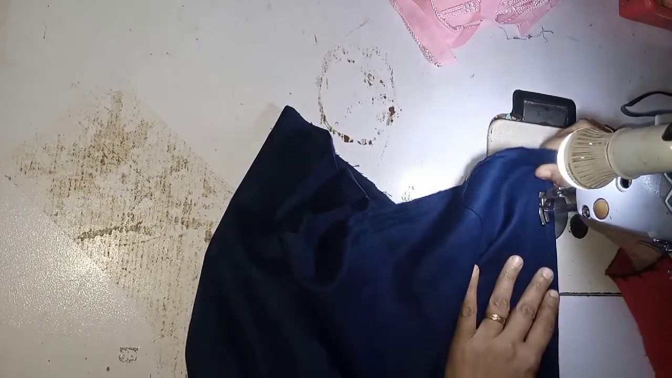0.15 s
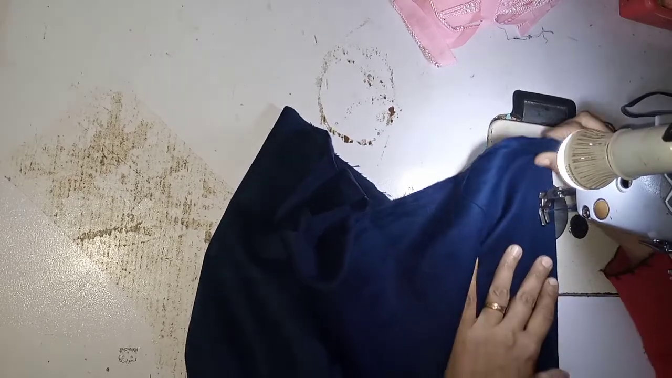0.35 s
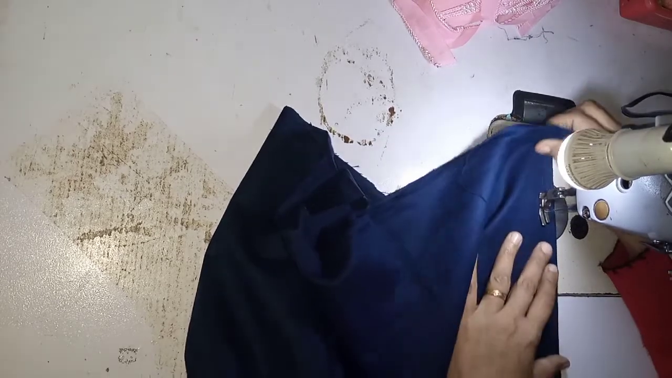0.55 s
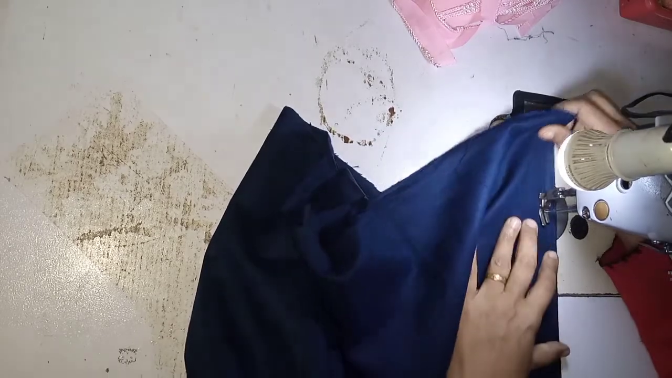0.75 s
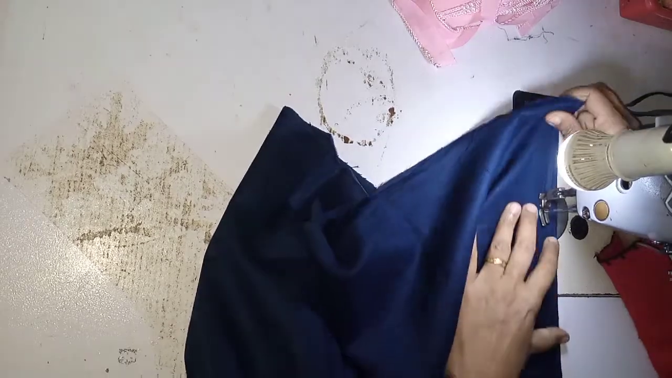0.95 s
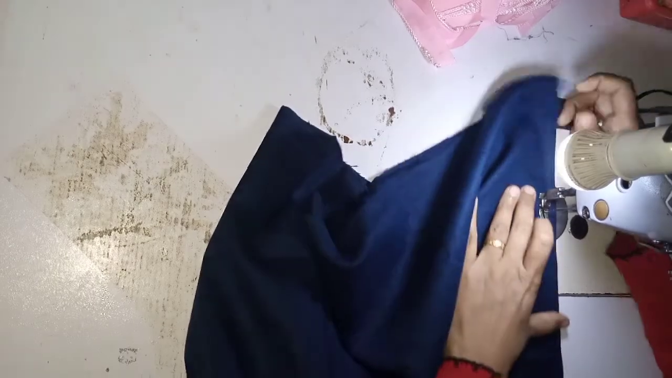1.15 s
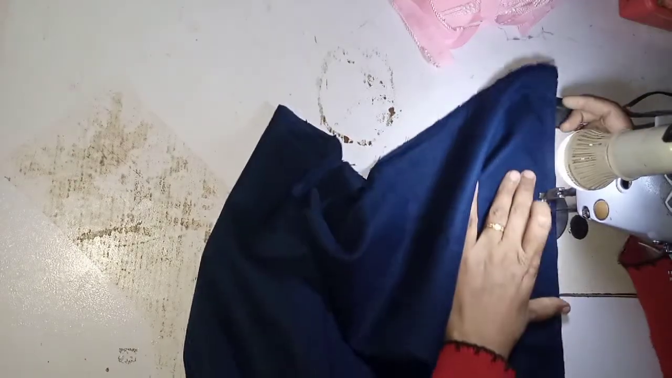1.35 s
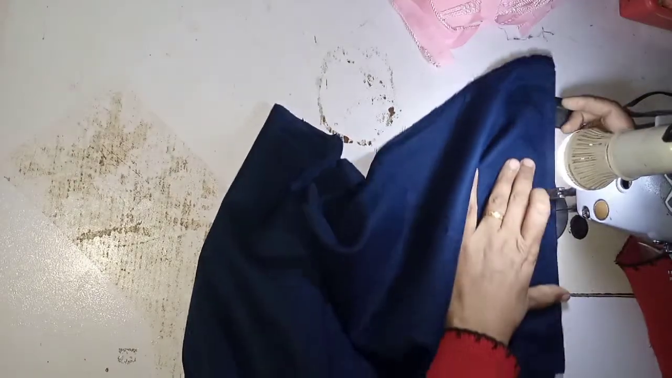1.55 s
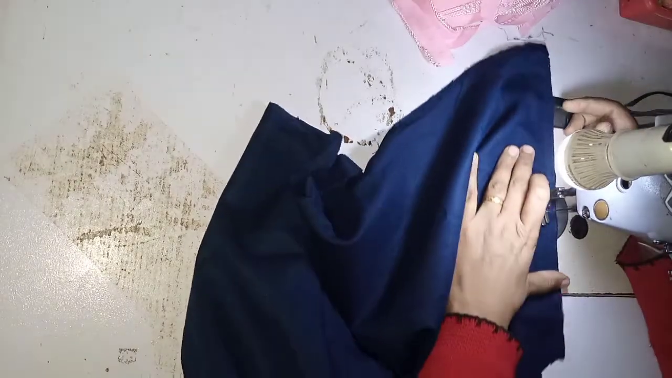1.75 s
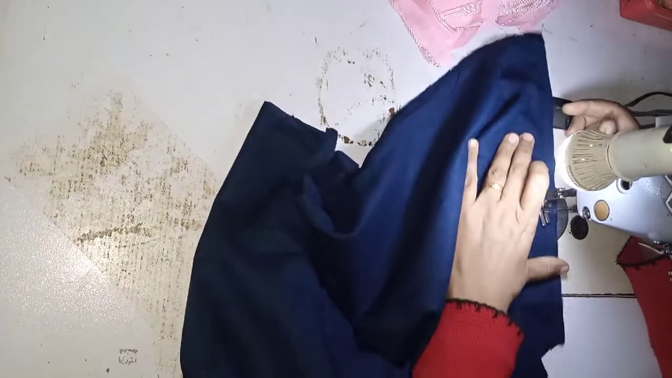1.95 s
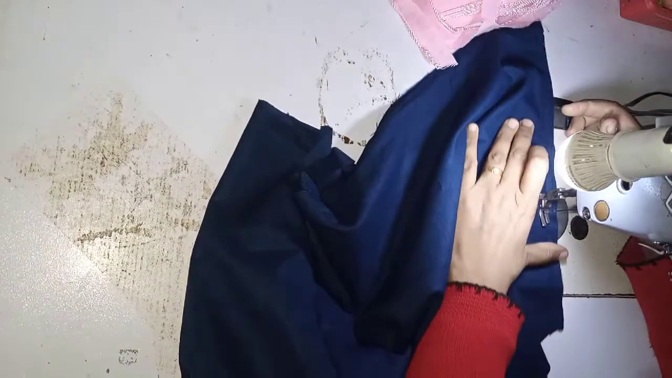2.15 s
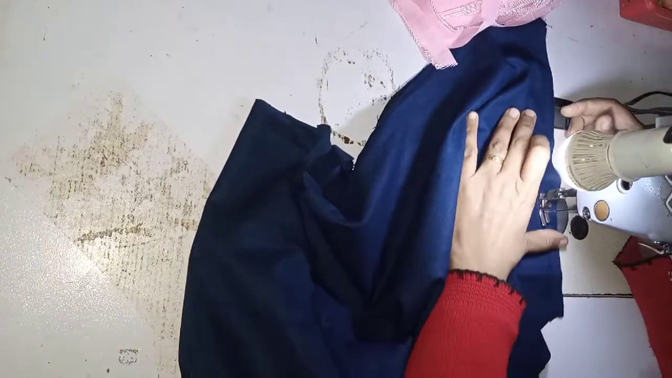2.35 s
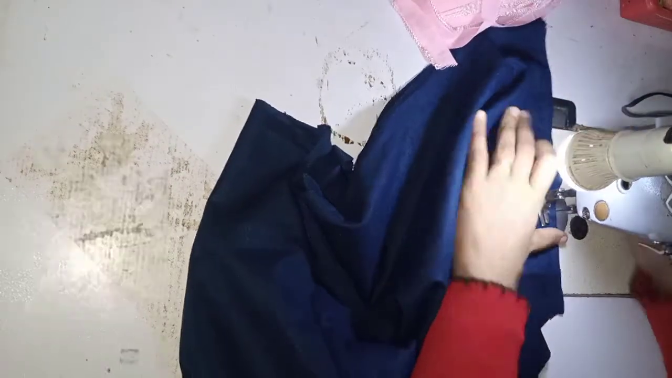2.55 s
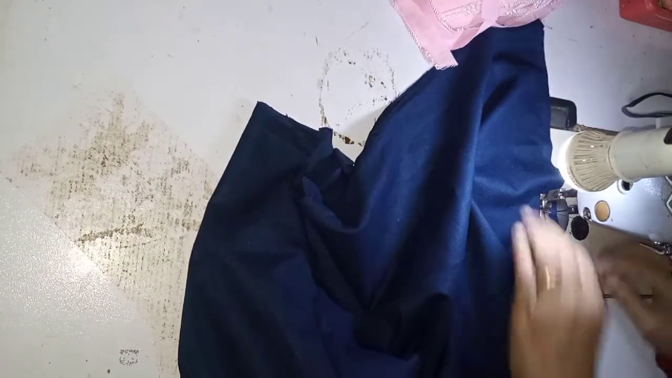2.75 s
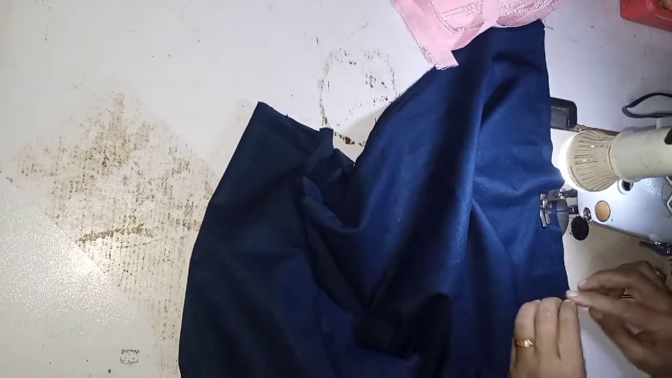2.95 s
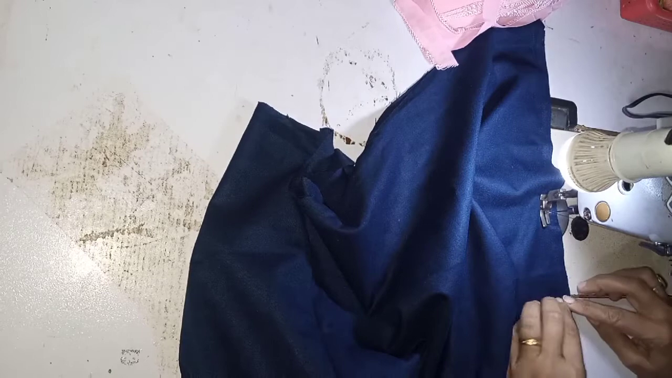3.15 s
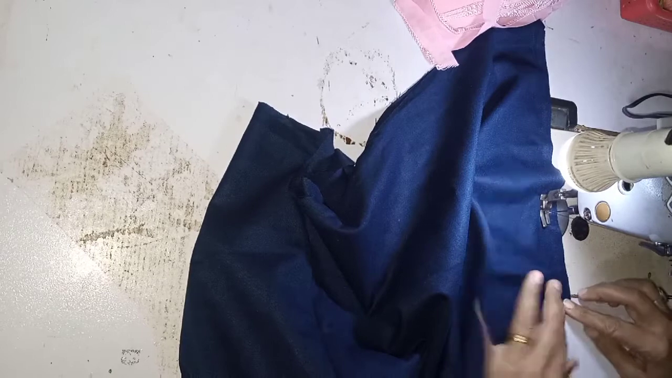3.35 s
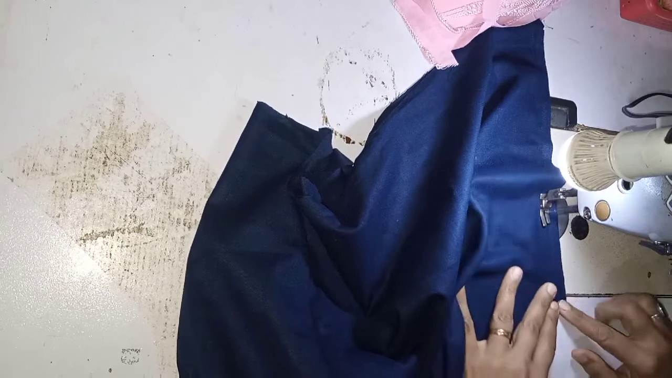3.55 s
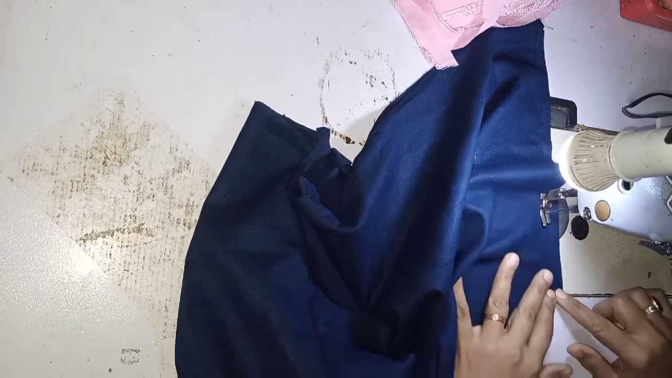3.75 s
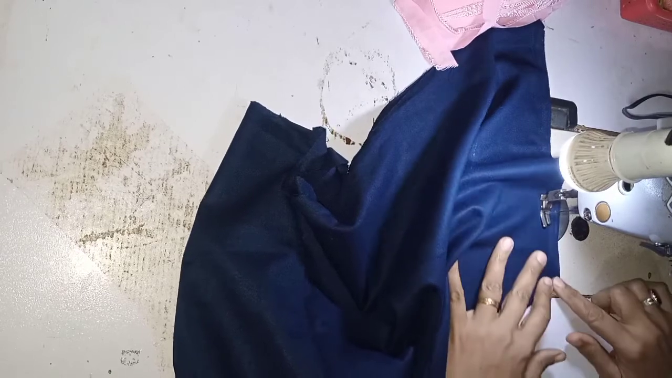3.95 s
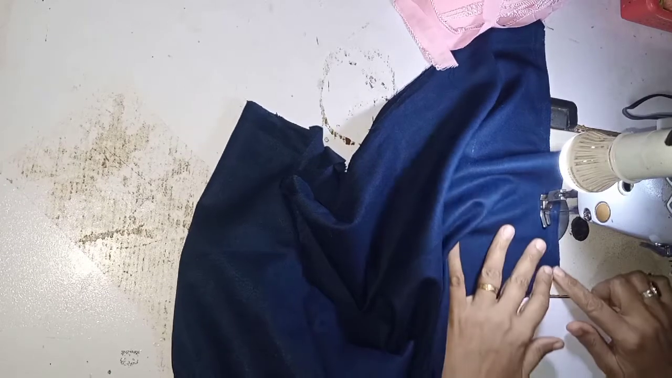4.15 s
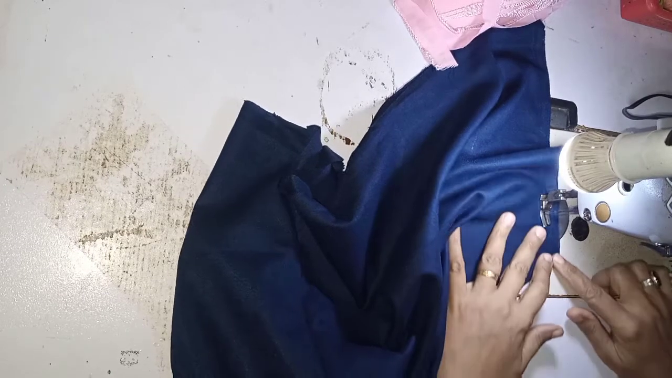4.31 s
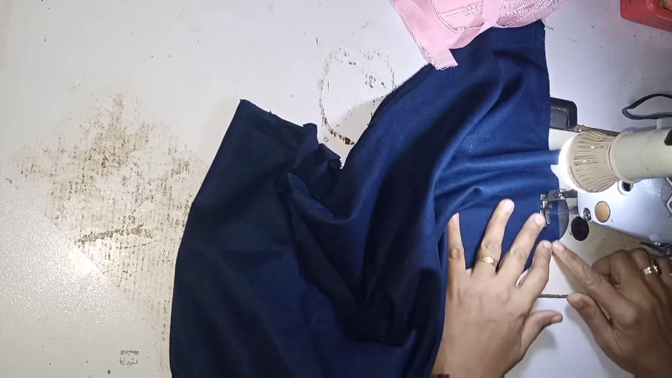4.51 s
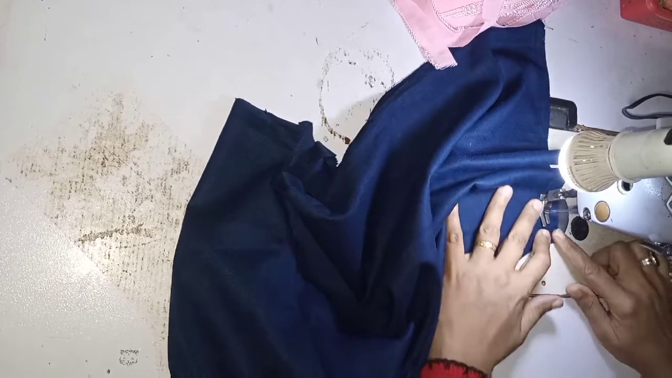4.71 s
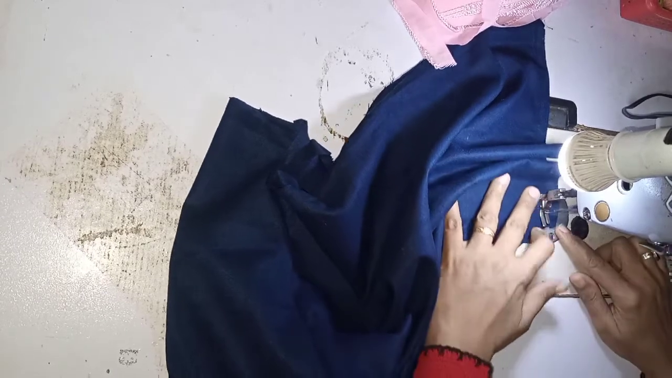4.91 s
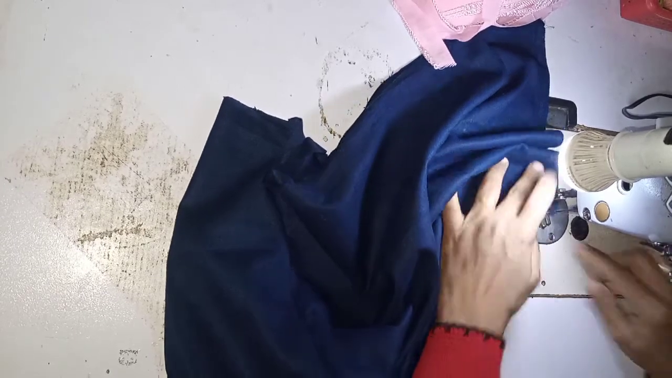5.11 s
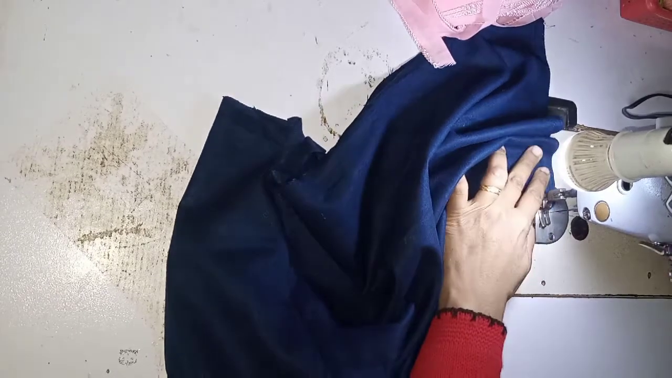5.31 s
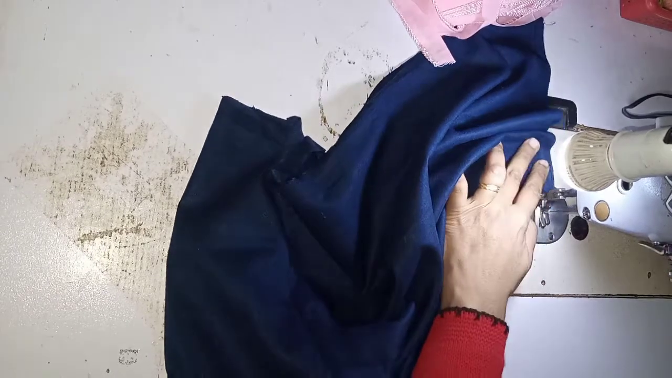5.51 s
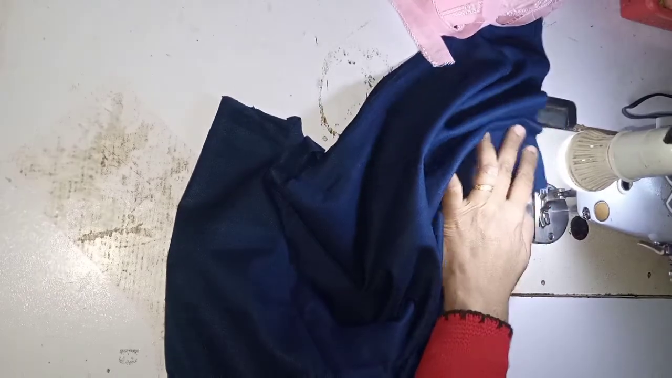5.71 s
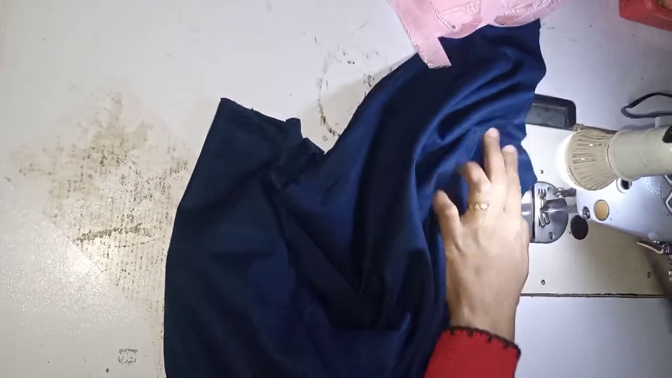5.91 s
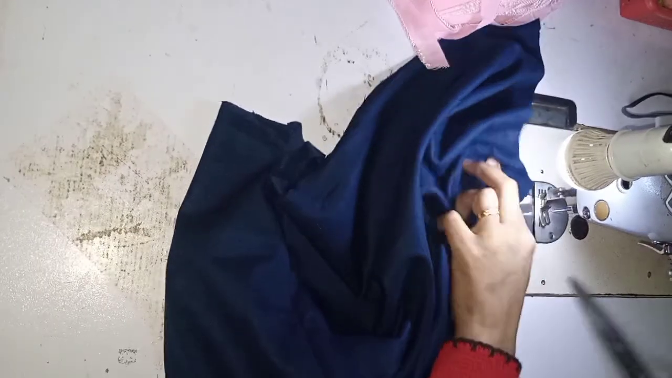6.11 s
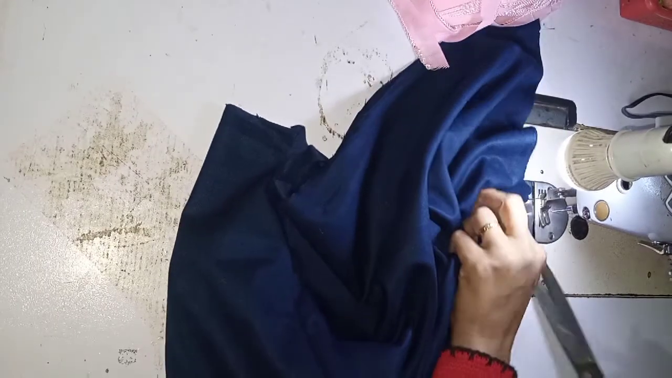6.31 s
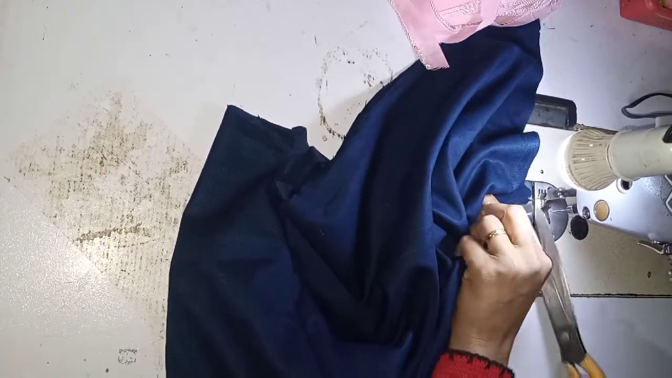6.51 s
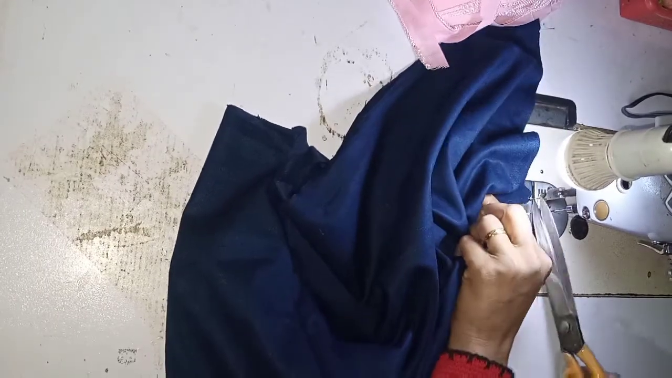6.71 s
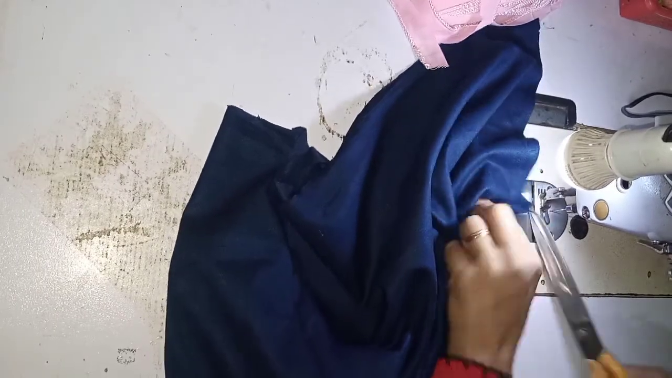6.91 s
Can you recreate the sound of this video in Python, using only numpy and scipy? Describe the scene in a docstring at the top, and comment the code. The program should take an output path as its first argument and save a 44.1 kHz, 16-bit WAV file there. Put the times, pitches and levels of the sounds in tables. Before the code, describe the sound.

Close up in a small, quiet room, an electric sewing machine buzzes and spins up into a rising whine, with fast metallic clatter and a low hum through the table. It winds down, runs again, then catches with a bright click for one last brief burst. Cloth rubs softly and the table gives dull knocks, before scissors clink, tick and scrape open.

```python
"""A soft bump and a rustle of cloth, then an electric sewing machine stitches three short runs in a small room.
The first two runs start with a buzz; the third catches the coasting motor with a bright click. The motor
whines up and coasts down; its belt drives the needle works, which clatter and shake the wooden table.
Soft knocks and rumbles come as the machine slows or stops, hands push the cloth and steel ticks lightly.
At the end scissors clink as they are brought in, and their blades scrape open."""
import sys
import numpy as np
from scipy import signal
from scipy.fft import rfft, irfft
from scipy.io import wavfile
from scipy.ndimage import uniform_filter1d

SR = 44100
rng = np.random.default_rng(int(sys.argv[2]) if len(sys.argv) > 2 else 0)


def bounce(signal):
    """Save signal as a 16-bit WAV file at the path given by the first command-line argument."""
    frames = np.transpose(np.atleast_2d(signal))
    limited = np.clip(frames, -1, 1)
    pcm = np.round(limited * 32767).astype(np.int16)
    wavfile.write(sys.argv[1], SR, pcm)


N = 311457
TIME = np.arange(N) / SR
TOP_TURNS_PER_S, STITCHES_PER_TURN, MAINS_PULL_HZ = 263.7, .1086, 100

# runs of stitching: (pedal down [s], spin-up starts [s], pedal up [s],
# early drag of the cloth [turns/s], buzz or click [dB], clack strength [dB])
RUNS = [(0.512, 0.568, 2.872, 35.3, -49.5, -31.5), (4.001, 4.048, 5.70, 15.7, -47.5, -24.5),
        (6.029, 6.032, 6.408, 24.0, -41.5, -33.5)]
# resonances of the needle works and of the scissor blades: (centre [Hz], width [Hz], lift [dB])
WORKS_MODES = [(1750, 87, 6.1), (1943, 22, 11), (2570, 60, 3), (2944, 140, 9.4), (3450, 360, 6.9),
               (4174, 80, 5.4), (5100, 290, 3.6), (5100, 92, 8.5), (6580, 81, 5.3), (8650, 73, 7.4)]
BLADE_MODES = [(1860, 110, 18), (2430, 50, 11), (3740, 80, 12), (6020, 70, 6), (6900, 90, 9.4)]


def from_db(db):
    """Decibels to gain."""
    return 10 ** (np.asarray(db) / 20)


def noise():
    """White noise."""
    return rng.standard_normal(N)


def drift(rate_hz):
    """A random wander with a spread of about one."""
    knots = rng.standard_normal(2048)
    return np.interp(TIME * rate_hz, np.arange(len(knots)), knots)


def cycle(turns):
    """A sine that follows a phase in turns, from a random starting angle."""
    return np.sin(2 * np.pi * (turns + rng.random()))


def gate(start, end, fade_s):
    """Fully open between two times, with short ramps outside."""
    return np.interp(TIME, [start - fade_s, start, end, end + fade_s], [0, 1, 1, 0])


def swell(peak_s, rise_s, fall_s):
    """An envelope that grows to one and dies away again."""
    return np.exp(-np.abs((TIME - peak_s) / np.where(TIME < peak_s, rise_s, fall_s)))


def burst(start_s, decay_s):
    """A contact that chatters and dies within milliseconds."""
    return noise() * (TIME >= start_s) * np.exp(-np.maximum(TIME - start_s, 0) / decay_s)


def evened(x, size=4400):
    """Ride the level to unit power; knocks and beats stay."""
    power = uniform_filter1d(uniform_filter1d(x ** 2, size), size)
    return x / np.sqrt(np.abs(power) + 1e-6 * np.mean(x ** 2))


def body(x, colour, modes=(), size=16384):
    """A resonant body of unit energy: a broad colour lifted by modes that ring after each push."""
    hz = np.maximum(np.arange(size // 2 + 1) * SR / size, 1)
    points = np.array(colour, float)
    db = np.interp(np.log(hz), np.log(points[:, 0]), points[:, 1])
    for centre, width, lift in modes:
        db = db + lift / (1 + (2 * (hz - centre) / width) ** 2)
    cepstrum = irfft(np.log(from_db(db)))
    cepstrum[1:size // 2] *= 2   # minimum phase: nothing rings before the push
    cepstrum[size // 2 + 1:] = 0
    response = irfft(np.exp(rfft(cepstrum)))[:size // 2]
    return signal.oaconvolve(x, response / np.linalg.norm(response))[:N]


def ring(pushes, modes):
    """Each push sets every mode ringing as a dying sine."""
    out = 0
    for hz, db, t60 in modes:
        decay, angle = from_db(-60 / (t60 * SR)), 2 * np.pi * hz / SR
        feedback = [1, -2 * decay * np.cos(angle), decay * decay]
        out = out + from_db(db) * signal.lfilter([0, np.sin(angle)], feedback, pushes + 1e-18)
    return out


def room(x, wet_db, t60_s=0.25):
    """Direct sound and the short diffuse tail of a small room."""
    t = TIME[:SR // 2]
    tail = rng.standard_normal(len(t)) * from_db(-60 * t / t60_s) * (t > .003)
    return x + from_db(wet_db) * signal.oaconvolve(x, tail / np.linalg.norm(tail))[:N]


def spread(mid, side, side_db):
    """Stereo width in the treble only."""
    treble = signal.sosfilt(signal.ellip(8, .5, 70, 4600, "high", fs=SR, output="sos"), side)
    return mid + from_db(side_db) * treble * np.array([[1], [-1]])


def room_tone(level_db=-67):
    """The air of the room, with a faint wavering hum gathered round one pitch."""
    air = [(25, -48), (45, -24.5), (240, -20), (290, -10), (322, 0.5), (355, -11.5), (440, -33), (630, -22),
           (760, -34), (2200, -36.5), (13000, -46.5)]   # (frequency [Hz], level [dB])
    hum = [(322, 10, 4.5)]   # (centre [Hz], width [Hz], lift [dB])
    return from_db(level_db) * body(noise(), air, hum)


def bumps_and_rubs(bump_db=-37):
    """A hand bumps the table dully; then brief swells each mix a table rumble with a brighter rub."""
    # the table's bump and rumble, a curve each, and the rub: (frequency [Hz], level [dB])
    wood_colours = [
        [(30, -29), (100, 9), (140, -3), (220, -17), (400, -28), (1000, -50)],
        [(30, -30), (80, -21), (130, 8.5), (220, -0.5), (380, -2.5), (520, -19.5), (800, -20), (1400, -53)],
    ]
    rub_colour = [(400, -15.5), (800, 3), (1400, -4), (2000, -2.5), (4700, -4.5), (6400, 3), (8500, -13),
                  (13000, -25)]
    # soft knocks and rumbles as the machine slows or stops, and pushes of the cloth:
    # (peak time [s], rise [s], rumble [dB], rub [dB])
    swells = [(0.05, .08, -63, -67.5), (3.37, .03, -61.5, -74), (3.97, .13, -76, -73.5),
              (5.975, 0.0043, -47, -49), (6.76, 0.11, -44.5, -51.5), (6.836, 0.0022, -47, -57.5),
              (6.92, 0.018, -53, -61), (7.03, 0.039, -59, -61)]
    dull, light = (body(noise(), colour) for colour in wood_colours)
    bump = from_db(bump_db) * swell(peak_s=0.0024, rise_s=.03, fall_s=.03) * dull
    rumble = light * sum(from_db(db) * swell(s, rise, fall_s=0.047) for s, rise, db, _ in swells)
    rub = sum(from_db(db) * swell(s, rise, fall_s=0.031) for s, rise, _, db in swells)
    return bump + rumble + spread(*(rub * body(noise(), rub_colour) for _ in range(2)), side_db=-11)


def steel_ticks(trim_db=-6):
    """The presser foot and the scissors tick: bright steel over a dull body."""
    ticks = [(0.3405, -58, -3), (3.3526, -45.5, -9), (6.764, -39.5, -15), (6.835, -61, 16),
             (6.901, -56, 15.5), (6.9413, -35.5, 6.5)]   # light contacts: (time [s], strength [dB], body relative to steel [dB])
    # the bright and the dull part of a tick: (frequency [Hz], level [dB])
    steel_colour = [(800, -17), (2500, -15), (4500, -7), (6300, 3), (9000, -5), (13000, -10)]
    dull_colour = [(150, -4), (300, 8), (500, -12), (800, 2.5), (1300, -16), (1900, 3), (2800, -43),
                   (6000, -36)]
    taps = [from_db(db + trim_db) * burst(s, decay_s=.003) for s, db, _ in ticks]
    dull_taps = [tap * from_db(dull_db) for tap, (_, _, dull_db) in zip(taps, ticks)]
    return body(sum(taps), steel_colour, BLADE_MODES) + body(sum(dull_taps), dull_colour)


def switch_on(mains_depth=0.3):
    """The brushes buzz with the mains before the first two runs; the third burst is a bright click."""
    fizz_colour = [(120, -39), (200, -8), (667, -4), (1090, -5), (1520, -7), (2310, -7), (2520, 1.5),
                   (3270, -10), (4100, -9), (4970, -3), (6030, -3), (6690, -2.5), (13000, -21)]   # (frequency [Hz], level [dB])
    bursts = sum(from_db(db) * gate(down, spin, fade_s=0.0067) for down, spin, *_, db, _ in RUNS)
    level = bursts * (1 + mains_depth * cycle(MAINS_PULL_HZ * TIME))
    return spread(*(level * body(noise(), fizz_colour) for _ in range(2)), side_db=-12)


def start_clacks(trim_db=-4):
    """The works clack as each run takes hold."""
    clack_colour = [(80, -19), (350, -2), (850, 6.5), (1300, -10), (2000, -3.5), (4000, -20.5), (6500, -6),
                    (12000, -21)]   # (frequency [Hz], level [dB])
    jolts = sum(from_db(db + trim_db) * burst(spin, decay_s=0.0081) for _, spin, *_, db in RUNS)
    return body(jolts, clack_colour, WORKS_MODES[:5])


def shaft_speed(spin_up_s=.121, drag_eases_s=1.6, coast_s=.2, friction_turns_per_s=25):
    """Turns per second: each run spins up from the speed left, then coasts against dry friction."""
    speed = np.zeros(N)
    for _, spin, up, drag, *_ in RUNS:
        start, stop = int(spin * SR), int(up * SR)
        t = TIME[:N - start]
        aim = TOP_TURNS_PER_S - drag * np.exp(-t / drag_eases_s)
        speed[start:] = aim + (speed[start] - aim) * np.exp(-t / spin_up_s)
        decay = np.exp(-TIME[:N - stop] / coast_s)
        speed[stop:] = np.maximum((speed[stop] + friction_turns_per_s) * decay - friction_turns_per_s, 0)
    return speed


def loudness(law, speed, current):
    """Gain lags behind the effort: the speed plus the strain of pulling up to it."""
    top_db, exponent, strain, lag_s = law
    pace = speed / TOP_TURNS_PER_S
    effort = (pace + min(strain, 1) * current * (1 - pace)) * (speed > 0)
    hold = np.exp(-1 / (lag_s * SR))
    return from_db(top_db) * signal.lfilter([1 - hold], [1, -hold], effort + 1e-18) ** exponent


def knocks(turns, scatter_db):
    """One push for every contact of every stitch, with a random scatter of force."""
    # needle, hook, take-up lever, feed dog: (place in the stitch [0-1], level [dB])
    contacts = [(.05, -10.5), (.29, -11), (0.523, -13), (.8, -15.5)]
    stitches = turns * STITCHES_PER_TURN
    pushes = sum(from_db(db) * (np.diff(np.floor(stitches - place), prepend=-1) > 0)
                 for place, db in contacts)
    return pushes * (stitches > 0) * from_db(scatter_db * np.clip(noise(), -2, 2))


def motor_whine(speed, turns, current, belt_depth=0.072, mains_depth=0.13, waver_db=1.5,
                rasp_db=-4.5, rasp_depth=0.48):
    """Rotor and bearing tones and a rasp once a turn, swayed by belt and mains, ring in the housing."""
    # tones, whole from the rotor and the rest from its bearings: (multiple of the speed), (level [dB])
    multiples = [2.768, 3, 3.768, 3.857, 4, 5, 5.143, 5.231, 5.768, 6]
    levels = [-4, 1.5, -3, -16.5, 3.5, 1, -6, -6.5, -8.5, -5]
    housing_colour = [(200, -20.5), (480, -20.5), (680, -16), (860, -13), (1000, -7.5), (1130, -6.5),
                      (1340, 6), (1510, -0.5), (1620, -23.5), (2300, -34), (5000, -65.5)]   # (frequency [Hz], level [dB])
    housing_modes = [(756.5, 11, 11), (876, 74, 14), (939, 19, 4), (1027, 71, 7.9), (1261, 67, 1),
                     (1323, 19, 2)]   # (centre [Hz], width [Hz], lift [dB])
    belt_laps = turns * .0495
    belt_sway = belt_depth * (0.16 * cycle(belt_laps) + cycle(2 * belt_laps))
    load = 1 + belt_sway + mains_depth * current * cycle(MAINS_PULL_HZ * TIME)
    tones = sum(from_db(db + waver_db * drift(9.7)) * cycle(k * turns + 0.043 * drift(25))
                for k, db in zip(multiples, levels))
    whine = evened(body(tones * load, housing_colour, housing_modes)) * (speed / speed.max()) ** 2
    # part of the rasp escapes directly, so it rings a little less
    rasp_modes = [(hz, width, lift * 0.96) for hz, width, lift in housing_modes]
    scrape = noise() * load * (1 + rasp_depth * cycle(turns))
    rasp = evened(body(scrape, housing_colour, rasp_modes))
    return evened(whine + from_db(rasp_db) * rasp)


def table_shake(speed, turns, current, thud_db=-10, rumble_db=-7, hum_db=-5):
    """The swinging needle works, their knocks and the mains hum shake the table."""
    # swing of the works: (multiple of the stitch rate), (level [dB])
    multiples = [2, 3, 4, 5, 6, 7, 8, 10, 11, 12]
    levels = [7, -3.5, 8, 3, -1, -7, -7.5, 0, -4, -0.5]
    wood_colour = [(20, -24), (45, -30.5), (80, -10), (120, -9), (170, -4.5), (300, -5), (420, -1),
                   (600, -16), (1200, -41.5)]   # (frequency [Hz], level [dB])
    wood_modes = [(107.8, 46, 6.5), (133.7, 15, 7.8), (218.5, 50, 11.8), (305, 22, 8.4)]   # (centre [Hz], width [Hz], lift [dB])
    stitches, pace = turns * STITCHES_PER_TURN, speed / speed.max()
    swing = sum(from_db(db + 2.59 * drift(8)) * cycle(k * stitches + 0.091 * drift(8))
                for k, db in zip(multiples, levels))
    shake = pace * evened(body(swing, wood_colour, wood_modes))
    hum = current * cycle(MAINS_PULL_HZ * TIME) * from_db(2.2 * drift(8.1))
    thuds = evened(body(knocks(turns, scatter_db=8.0), wood_colour, wood_modes))
    rumble = body(noise(), wood_colour, wood_modes)
    rumble /= np.sqrt(np.mean(rumble ** 2))
    return evened(shake + from_db(hum_db) * hum + from_db(thud_db) * thuds + from_db(rumble_db) * rumble)


def needle_clatter(speed, turns, rattles_per_turn=16, knock_db=8, hiss_db=-4, turn_depth=0.18,
                   flutter_db=0.97, plate_db=2.5):
    """Stitch contacts, loose parts rattling with each turn and sliding steel ring the metal works."""
    works_colour = [(300, -17), (900, -4.5), (1600, -5.5), (2200, -8.5), (2650, -3.5), (3250, -12),
                    (4600, -5.5), (5450, -6), (5900, -0.5), (7200, -2), (8000, -10), (9300, -16),
                    (10700, -16), (12000, -22)]   # (frequency [Hz], level [dB])
    strikes = from_db(knock_db) * knocks(turns, scatter_db=0.5)
    force = (1 + turn_depth * cycle(turns)) * from_db(flutter_db * drift(45))
    plate_surge = from_db(plate_db * drift(32)) - 1   # thin plates rattle in surges of their own
    plate_band = signal.butter(1, [5600, 7600], "band", fs=SR, output="sos")
    mid_and_side = []
    for _ in range(2):
        rattles = (rng.random(N) < rattles_per_turn * speed / SR) * rng.uniform(-2, 2, N)
        hiss = from_db(hiss_db) * noise() * np.sqrt(.1 + speed / speed.max())
        drive = strikes + force * (rattles + hiss)
        drive = drive + plate_surge * signal.sosfilt(plate_band, drive)
        mid_and_side.append(evened(body(drive, works_colour, WORKS_MODES)))
    return spread(*mid_and_side, side_db=-4.3)


def mount_boom(speed, turns, current, peak_db=-25.5, octave_db=-2, coast_share=0.67):
    """The unbalanced rotor booms through its mount's resonance, and at half that speed when coasting."""
    mount_modes = [(216.4, 28, 30)]   # (centre [Hz], width [Hz], lift [dB])
    mount_colour = [(20, -3.5), (260, -4.5), (450, -11.0)]   # (frequency [Hz], level [dB])
    pace = speed / TOP_TURNS_PER_S
    unbalance = cycle(turns) * pace ** 2 * (coast_share + (1 - coast_share) * current)
    octave = from_db(octave_db) * cycle(2 * turns) * pace * (1 - current)
    boom = body(unbalance + octave, mount_colour, mount_modes)
    return from_db(peak_db) * boom / np.abs(boom).max()


def run_down(speed, turns, current, groan_db=-36, ring_db=-35, slide_db=-31, flutter_db=2):
    """Pedal up: the rotor groans downwards, the slack works slide, the last stitches ring the steel."""
    slide_colour = [(200, -12), (550, 1.5), (900, 4), (1600, -2), (3000, -2), (4500, -7), (7000, -3),
                    (9000, -6.5), (13000, -15.5)]   # (frequency [Hz], level [dB])
    steel_ring = [(854, 5, 0.2), (1942, 2, 0.16), (2660, -3, .15), (3560, -5, 0.21)]   # (frequency [Hz], level [dB], t60 [s])
    pace, coasting = speed / TOP_TURNS_PER_S, 1 - current
    rough_tones = sum(cycle(k * turns + .25 * drift(90)) for k in (3, 4))
    groan = from_db(groan_db) * pace ** 2.6 * rough_tones
    strikes = from_db(ring_db) * pace * knocks(turns, scatter_db=2.5)
    rub = from_db(slide_db + flutter_db * drift(70)) * pace ** 1.8
    slide = spread(*(rub * body(noise(), slide_colour) for _ in range(2)), side_db=-6.5)
    return coasting * (groan + slide) + ring(coasting * strikes, steel_ring)


def scissor_clinks():
    """The blades touch and ring on as the scissors are brought in."""
    clinks = [(6.504, -37), (6.61, -54), (6.765, -61)]   # (time [s], level [dB])
    blade_ring = [(2480, 2, 0.27), (3000, -3, .15), (3440, -5, 0.23), (4840, -7, .12)]   # (frequency [Hz], level [dB], t60 [s])
    touches = np.zeros(N)
    for s, db in clinks:
        touches[int(s * SR)] = from_db(db)
    return ring(touches, blade_ring)


def scissor_scrape(start_s=6.942, level_db=-45, fade_db_per_s=30, grit_db=3):
    """The blades part and scrape along each other, ringing as they go."""
    blade_colour = [(40, -28), (130, 13), (220, 15), (350, -5), (520, -10), (800, 5), (1300, -8),
                    (2200, -4.5), (4800, -6), (6100, 5), (8500, -1), (12500, -15)]   # (frequency [Hz], level [dB])
    fade_db = fade_db_per_s * np.maximum(TIME - start_s, 0)
    level = (TIME > start_s) * from_db(level_db - fade_db + grit_db * drift(280))
    return spread(*(body(level * noise(), blade_colour, BLADE_MODES) for _ in range(2)), side_db=-15)


def scene():
    """One shaft drives motor, table and needle works; small noises and room tone surround them."""
    # how each layer follows effort:
    # (level at top speed [dB], exponent, strain at standstill [capped at 1], lag [s])
    shake_law = (-35, 1.4, 1.5, 0.0742)
    whine_law = (-24.5, 3.2, 0.56, 0.0452)
    clatter_law = (-24.5, 2.45, .41, 0.02)
    speed = shaft_speed()
    turns = np.cumsum(speed) / SR
    current = sum(gate(down, up, fade_s=0.028) for down, _, up, *_ in RUNS)
    shake = loudness(shake_law, speed, current) * table_shake(speed, turns, current)
    boom = mount_boom(speed, turns, current)
    whine = loudness(whine_law, speed, current) * motor_whine(speed, turns, current)
    clatter = loudness(clatter_law, speed, current) * needle_clatter(speed, turns)
    machine = shake + boom + whine + clatter + run_down(speed, turns, current) + switch_on()
    hits = start_clacks() + steel_ticks()
    hits_in_room = spread(room(hits, wet_db=-3), room(hits, wet_db=0), side_db=-8)
    return machine + hits_in_room + bumps_and_rubs() + scissor_clinks() + scissor_scrape() + room_tone()


def record(dry):
    """A steep low-pass takes off the highest treble."""
    cutoff_hz = 13100
    return signal.sosfilt(signal.ellip(12, .2, 80, cutoff_hz, fs=SR, output="sos"), dry)


dry = scene()
out = record(dry)
bounce(out)
```